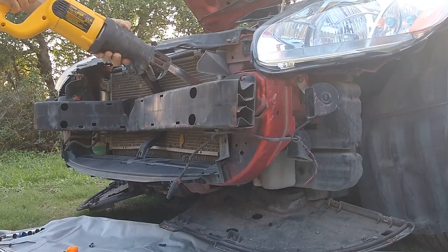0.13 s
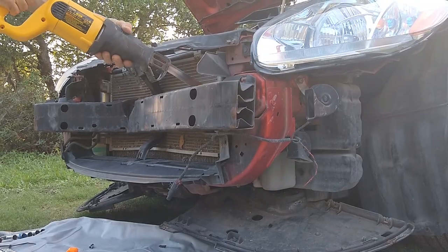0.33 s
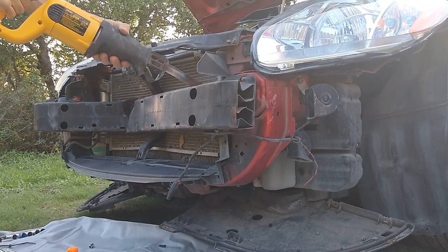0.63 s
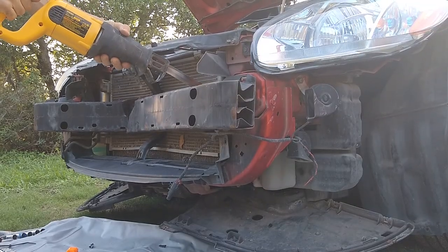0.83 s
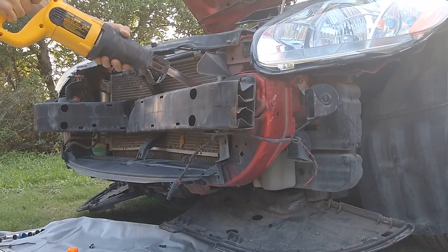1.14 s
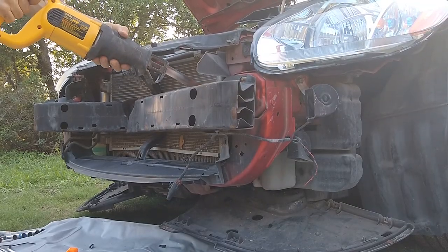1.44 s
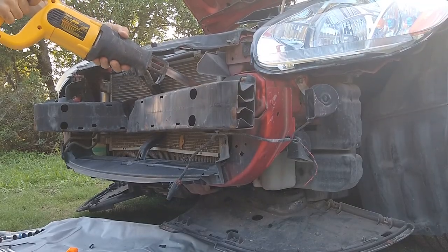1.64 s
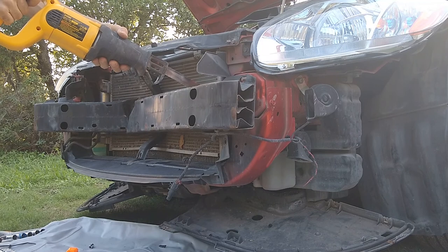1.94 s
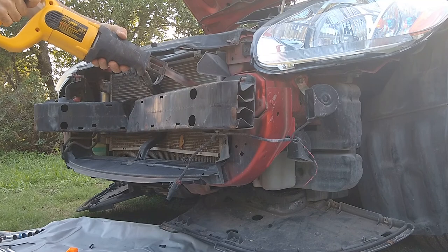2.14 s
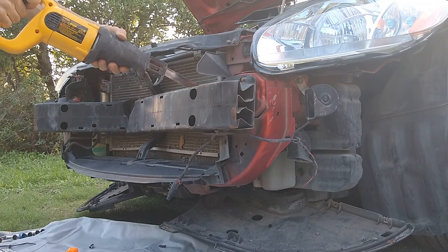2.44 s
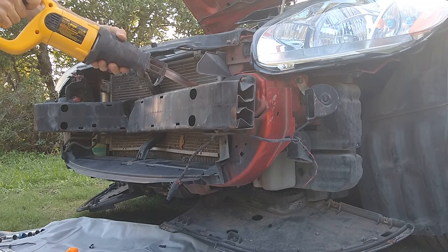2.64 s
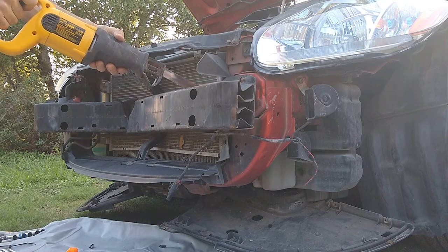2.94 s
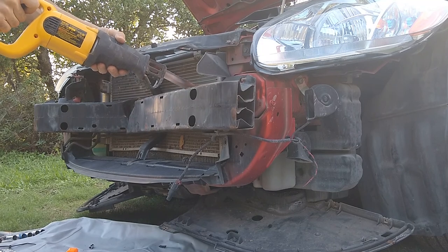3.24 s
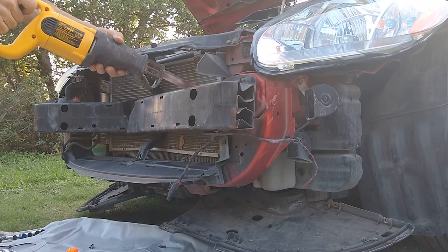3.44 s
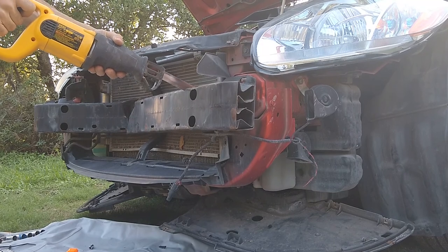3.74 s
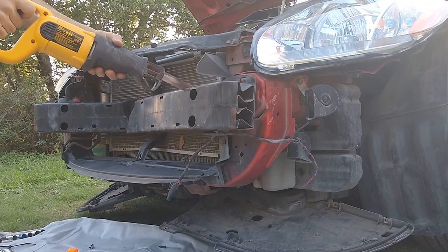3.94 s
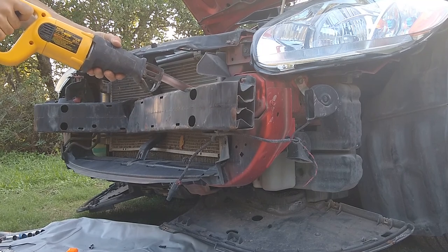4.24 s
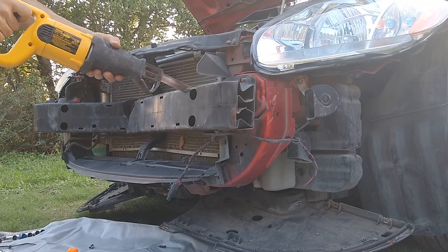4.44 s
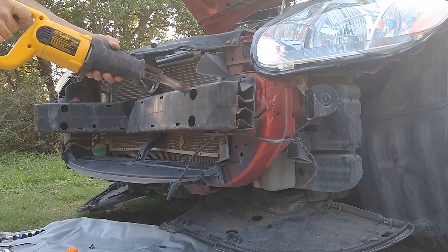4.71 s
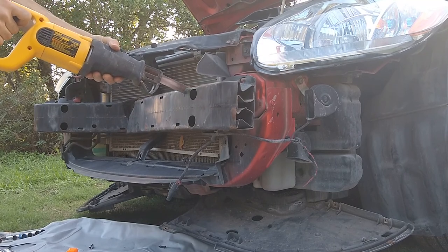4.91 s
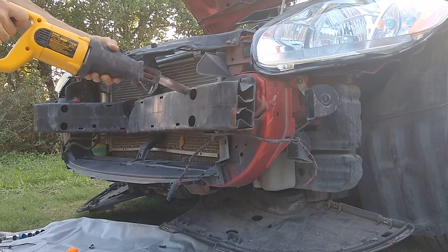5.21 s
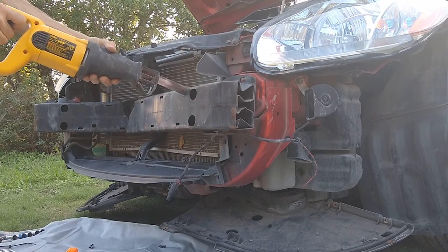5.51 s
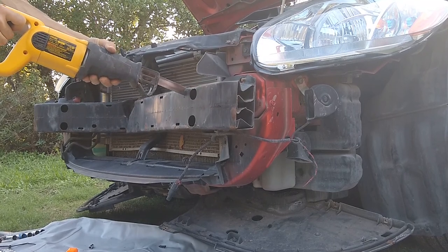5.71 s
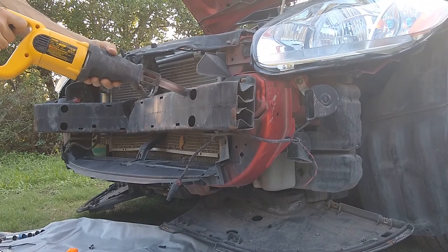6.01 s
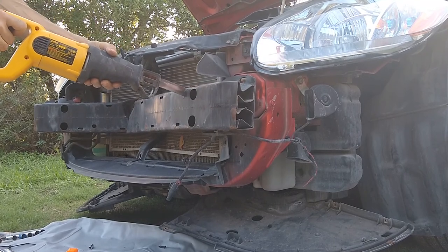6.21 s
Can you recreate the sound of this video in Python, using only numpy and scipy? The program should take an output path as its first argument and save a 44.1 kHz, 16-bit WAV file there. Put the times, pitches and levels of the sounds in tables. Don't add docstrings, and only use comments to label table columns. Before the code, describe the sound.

A reciprocating saw rasps steadily through a rusty steel bracket outdoors, a bright metallic hiss with gear whine, rapid buzzing knocks and faint breeze.

```python
import sys
import numpy as np
from scipy import signal
from scipy.fft import rfft, irfft, next_fast_len
from scipy.io import wavfile
from scipy.ndimage import uniform_filter1d, map_coordinates

SR = 44100
rng = np.random.default_rng(int(sys.argv[2]) if len(sys.argv) > 2 else 0)


def linear_from_db(decibels):
    return 10 ** (np.asarray(decibels, float) / 20)


def dump_mix(stems):
    frames = np.atleast_2d(stems).T
    limited = np.clip(frames, -1, 1)
    pcm = np.round(limited * 32767).astype(np.int16)
    wavfile.write(sys.argv[1], SR, pcm)


N = 280514

# t/s, speed/(turns per s)
SHAFT_SPEED = [(0, 116), (.1, 123), (.27, 98), (.36, 95), (.42, 113), (.5, 125), (.68, 128.3), (.87, 128.8),
               (1.2, 126.4), (1.7, 125.2), (2.2, 123.7), (2.75, 125.4), (3.3, 125.4), (3.6, 126.2),
               (4.65, 126.5), (5.2, 128), (5.9, 128.6), (6.36, 128.5)]
# t/s, level/dB
BLADE_PRESSURE = [(0.0, -39.5), (0.19, -38.5), (0.3, -40.5), (1.01, -39.5), (1.43, -41), (1.47, -39),
                  (1.59, -42), (1.63, -39.5), (2.18, -41.5), (3.03, -42), (3.33, -43), (5.1, -41.5),
                  (5.77, -41), (6.13, -39), (6.15, -40), (6.36, -39.5)]
# t/s, depth/(0-1)
CUT_DEPTH = [(0, 0.06), (1.5, 0), (2.6, 0), (3.3, 0.59), (4, 0.73), (5, 1), (6.36, 1)]
# f/Hz, width/Hz, shallow-cut level/dB, deep-cut
# level/dB, left-right/dB
STEEL_MODES = [(2532, 45, -16.5, -11, 13), (3602, 130, 0.5, -4, 13.5), (4416, 53, -2, -6, -40.5),
               (4935, 280, -11.5, 6, 38.5), (5300, 69, -1.5, 5.5, 6.5), (5584, 87, 2.5, 2.5, 6),
               (5850, 450, -6, -4.5, 17.5), (6120, 58, 0, -9, 5), (6434, 64, 4, 1, -9),
               (7120, 470, -6.5, -2, 9), (8010, 150, -24, 2, -21), (8680, 380, -3.5, 2, 3),
               (9340, 320, -5, -10, -44),
               (9630, 100, -7.5, 1.5, -15), (10156, 61, 0.5, 1, 11), (10470, 81, -6, 8, -10.5),
               (11540, 82, -14, -11.5, 4), (11940, 130, 3, 0, 4), (12720, 200, -1.5, -8, -11),
               (12500, 150, -2, -4, -7), (14100, 120, 0, -1, -17), (14800, 150, -40, -21, -4),
               (13650, 200, -10, -3, -8), (13140, 70, -6, 1, 10), (15300, 350, -11, -7, 10),
               (14900, 360, -13, -1, -11),
               (5370, 77, 1.5, -8, -6), (4180, 83, 0, -5, 12), (4825, 57, 3, 5, 17),
               (8400, 49, -1, -14, -22), (11040, 330, -3.5, -8, -5), (11260, 130, -10, 1.5, 11)]
# f/Hz, level/dB
GRIT_SPECTRUM = [(300, -35), (900, -23), (2000, -14.5), (3200, -6), (4500, -6), (7000, -3.5), (10000, -6.5),
                 (13500, -4.5), (15500, -24)]
# t/s, level/dB
BREEZE_LEVEL = [(0, -55.5), (.35, -60.5), (.7, -57.5), (2.55, -57), (3.1, -51.5), (4.4, -53.5), (5.4, -54),
                (6, -56.5), (6.36, -57)]
# t/s, level/dB
STRONG_PUFFS = [(3.023, -38), (3.048, -44), (3.098, -44), (3.138, -42), (3.231, -44), (3.274, -44),
                (3.334, -35), (3.366, -41), (3.43, -41), (3.481, -46), (3.526, -45), (3.564, -40),
                (3.644, -46), (3.667, -44), (3.699, -44), (3.763, -44), (3.835, -43), (3.992, -42),
                (4.222, -44), (4.262, -40), (4.293, -39), (4.332, -38), (4.41, -38.5), (4.477, -44),
                (4.6, -43), (4.672, -40), (4.948, -41), (5.28, -41), (5.385, -43), (5.425, -44)]
# f/Hz, level/dB
PUFF_SPECTRUM = [(30, -68), (100, -18), (180, -12.5), (280, -3.5), (450, -1.5), (900, -3.5), (1600, -7),
                 (3000, -10.5), (6000, -23)]
# t/s, length/s, low ring level/dB, high ring level/dB
BLADE_SNAGS = [(.1, 0.23, -37, -45), (.23, 0.098, -39, -45), (.32, .06, -30, -44), (.44, 0.18, -38, -45),
               (.57, .08, -44, -49), (.65, 0.02, -58, -38), (.7, 0.055, -39, -59), (.83, 0.084, -60, -45),
               (1.25, 0.29, -48, -61), (1.5, 0.05, -62, -47), (1.58, 0.05, -68, -51),
               (1.68, 0.18, -48, -51), (1.82, 0.055, -44, -48), (2.1, 0.076, -57, -48),
               (2.32, .06, -46, -46), (2.78, 0.093, -45, -56), (2.87, .1, -69, -48), (3.88, .08, -70, -48),
               (4.17, 0.062, -50, -49), (4.25, 0.036, -41, -74), (4.59, 0.043, -70, -40),
               (4.64, 0.022, -36, -37), (4.73, 0.084, -44, -38), (4.8, 0.044, -51, -38),
               (4.99, 0.17, -54, -45.5), (5.39, .08, -65, -49), (5.66, 0.33, -55, -45),
               (5.95, 0.03, -48, -36), (6.11, 0.065, -58, -47), (6.26, .1, -51, -42)]
# t/s, length/s, level/dB
HUM_SPELLS = [
    (.55, 0.17, -68),
    (.95, 0.53, -65),
    (1.75, 0.47, -72),
    (2.2, 0.65, -67.5),
    (2.72, 0.24, -68),
    (3.3, 1.4, -74),
    (5.8, 2.2, -71.5),
]
# t/s, length/s, level/dB
UPPER_HUM_SPELLS = [
    (2.5, .8, -62),
]
# t/s, length/s, level/dB
DRONE_SPELLS = [
    (3.3, 1.3, -61),
    (4.4, 1.4, -63),
]
# t/s, length/s, lower level/dB, upper level/dB
SQUEAL_SPELLS = [
    (4.35, 0.33, -70, -49),
    (4.7, 0.36, -46, -56),
    (5.05, 0.15, -40.5, -69),
]


def unit(x):
    return x / np.sqrt(np.mean(x ** 2) + 1e-20)


def curves(rows):
    t_s, *columns = np.transpose(rows)
    return [np.interp(np.arange(N) / SR, t_s, column) for column in columns]


def wobble(rate_hz):
    knots = rng.standard_normal(int(N * rate_hz / SR) + 4)
    return map_coordinates(knots, [np.arange(N) * rate_hz / SR], order=1)


def filtered(x, response):
    size = next_fast_len(N + 8192)
    return irfft(rfft(x, size) * response(np.fft.rfftfreq(size, 1 / SR)), size)[..., :N]


def coloured(x, spectrum):
    f_hz, level_db = np.transpose(spectrum)
    return filtered(x, lambda hz: linear_from_db(np.interp(np.log(hz + 1), np.log(f_hz), level_db)))


def ring(x, hz, width_hz):
    return signal.lfilter(*signal.iirpeak(hz, hz / max(width_hz, 20), SR), x)


def double_ring(x, hz, width_hz):
    return unit(ring(ring(x, hz, width_hz), hz, width_hz))


def ports(alike):
    common, left, right = rng.standard_normal((3, N))
    return np.sqrt(alike) * common + np.sqrt(1 - alike) * np.array([left, right])


def sided(db):
    return linear_from_db([[db / 2], [-db / 2]])


def turns():
    return np.cumsum(curves(SHAFT_SPEED)[0]) / SR


def bog():
    return np.clip(124 - curves(SHAFT_SPEED)[0], 0, None)


def per_turn(spread):
    size, phase = rng.random((2, 120))
    orders = (1 - 0.7 * spread * size) * np.exp(2j * np.pi * spread * phase)
    one_turn = irfft(np.pad(orders, (2, 0)), 8192)
    return unit(np.interp(turns() % 1, np.arange(8192) / 8192, one_turn, period=1))


def swells(rows, *resting_db):
    t_s = np.arange(0, N, 64) / SR
    depth, = curves(CUT_DEPTH)
    start_s, length_s, *levels_db = np.transpose(rows)
    bells = np.exp(-(2 * (t_s[:, None] - start_s) / length_s) ** 2)
    gains = []
    for level_db, (shallow_db, deep_db) in zip(levels_db, resting_db):
        spells = np.interp(np.arange(N) / SR, t_s, bells @ linear_from_db(level_db))
        gains.append(spells + linear_from_db(shallow_db + (deep_db - shallow_db) * depth))
    return gains


def rasp():
    depth, = curves(CUT_DEPTH)
    gear_spectrum = [(1000, -0.5), (6000, -5.0), (9000, -15), (15000, -33)]
    gears = coloured(per_turn(spread=0.96) * linear_from_db(3.8 * wobble(30)), gear_spectrum)
    chatter_db = 2 + 0.16 * bog()
    bite_db = chatter_db * np.cos(2 * np.pi * turns()) + 1.64 * wobble(250)
    teeth = ports(alike=0.38) * linear_from_db(bite_db) + 0.53 * gears
    steel = coloured(ports(alike=0.32) + 0.49 * gears, GRIT_SPECTRUM) * sided(-1.3)
    modes = STEEL_MODES
    for k, (hz, width_hz, shallow_db, deep_db, side_db) in enumerate(modes):
        mode_db = 0.5 + shallow_db + (deep_db - shallow_db) * depth
        swell = linear_from_db(mode_db + 1.6 * wobble(3.37) + 2.2 * wobble(9))
        side = (-1) ** k * sided(np.clip(side_db, -9, 9))
        steel += side * swell * ring(teeth, hz, 0.46 * width_hz + 45)
    loudness = np.sqrt(uniform_filter1d(np.mean(steel ** 2, 0), size=SR // 2))
    return linear_from_db(curves(BLADE_PRESSURE)[0] + 3.5) * steel / loudness


def gear_whine():
    angle = 2 * np.pi * turns()
    phase = 55 * angle + 1.3 * np.sin(angle + 0.8) + 0.25 * wobble(30)
    mesh = np.sin(phase) * (1 + 0.6 * np.cos(angle + 0.8))
    mesh_db, mesh_db_per_turn = -9.5, 0.2
    level_db = curves(BLADE_PRESSURE)[0] + mesh_db - mesh_db_per_turn * bog() + 5.5
    return linear_from_db(level_db + 2.5 * wobble(9)) * mesh * [[0.2], [1]]


def breeze():
    level = linear_from_db(curves(BREEZE_LEVEL)[0])
    lumps = linear_from_db(2.36 * np.array([wobble(60), wobble(60)]) + 0.9 * wobble(8.3))
    pops = (rng.random((2, N)) < 120 / SR) * rng.standard_normal((2, N))
    air = unit(coloured(lumps * ports(alike=0.25), PUFF_SPECTRUM))
    air = air + 0.5 * unit(coloured(pops, PUFF_SPECTRUM))
    buffets = linear_from_db(-32 + 7.1 * wobble(8.5)) * double_ring(ports(alike=1.0), 70, 150)
    strong = np.zeros((2, N + 600))
    tail_s = np.arange(600) / SR
    for t_s, level_db in STRONG_PUFFS:
        flutter = 0.08 * linear_from_db(-60 * tail_s / 0.04) * rng.standard_normal((2, 600))
        flutter[:, 0] = [0.05, 1]
        start = round(t_s * SR) - 40
        strong[:, start:start + 600] += linear_from_db(level_db + 36.5) * flutter
    puffs = ring(coloured(strong[:, :N], PUFF_SPECTRUM), 320, 550)
    return (level * (air + buffets) + puffs) * sided(-4.0)


def knocks():
    blows = per_turn(spread=0) * linear_from_db(1.5 * wobble(60))
    scrape = unit(ports(alike=0.25) * linear_from_db(5.5 * np.cos(2 * np.pi * (turns() - 0.1))))
    low_rest_db, high_rest_db = (-42.5, -63), (-58.5, -59)
    low_gain, high_gain = swells(BLADE_SNAGS, low_rest_db, high_rest_db)
    low = unit(ring(ring(1.3 * blows + scrape, 3640, 190), 3640, 420))
    high = unit(ring(ring(2.2 * blows + scrape, 4950, 210), 4950, 420))
    low = low_gain * linear_from_db(0.64 * wobble(12) - 13.5) * low * sided(0.3)
    high = high_gain * linear_from_db(1.15 * wobble(12) - 4.5) * high * sided(1.7)
    return low + high


def housing_hum():
    blows = per_turn(spread=0)
    low_gain, = swells(HUM_SPELLS, (-74.5, -82))
    high_gain, = swells(UPPER_HUM_SPELLS, (-67, -79))
    low = low_gain * linear_from_db(3.0 + 2.9 * wobble(16)) * double_ring(blows, 869.6, 68)
    high = high_gain * linear_from_db(-4.0 + 2.2 * wobble(15)) * double_ring(blows, 1614, 170)
    return low + high


def drone():
    gain, = swells(DRONE_SPELLS, (-85, -78))
    return gain * linear_from_db(-3.0 + 4.2 * wobble(3.4)) * np.sin(4 * np.pi * turns()) * [[-0.5], [1]]


def squeal():
    blows = per_turn(spread=0)
    lower_gain, upper_gain = swells(SQUEAL_SPELLS, (-75, -70), (-75, -70))
    lower = lower_gain * double_ring(blows, 3545, 64)
    upper = upper_gain * double_ring(blows, 4300, 66)
    return linear_from_db(-12.0 + 0.51 * wobble(14)) * (lower + upper)


def scene():
    return rasp() + gear_whine() + breeze() + knocks() + housing_hum() + drone() + squeal()


def roll_off(x):
    return signal.sosfilt(signal.butter(12, 15690, fs=SR, output="sos"), x)


def record(dry):
    cut = filtered(dry, lambda hz: 1 / np.sqrt(1 + (70 / (hz + 1)) ** 4))
    late = filtered(cut[::-1], lambda hz: 0.58 * np.exp(-2j * np.pi * hz / 7460))
    return roll_off(cut - late)


dry = scene()
out = record(dry)
dump_mix(out)
```